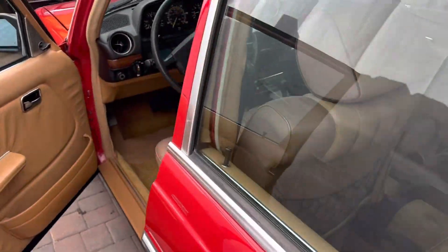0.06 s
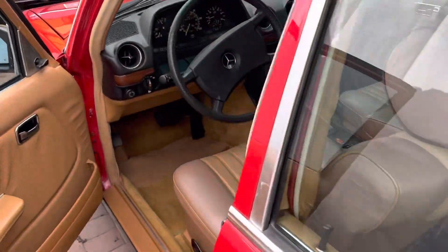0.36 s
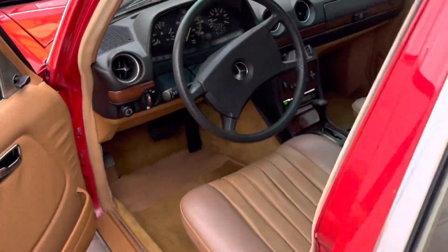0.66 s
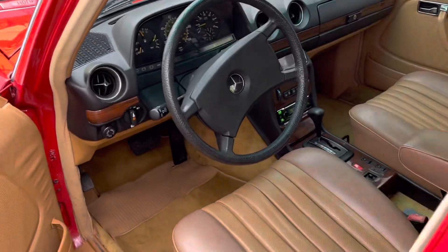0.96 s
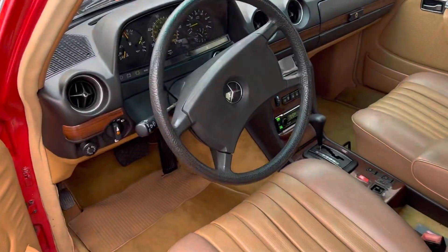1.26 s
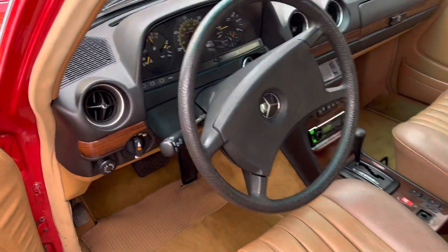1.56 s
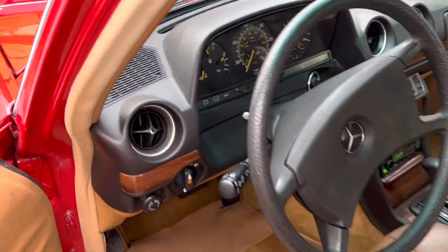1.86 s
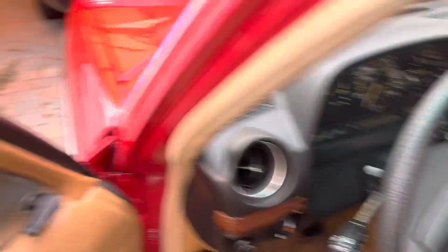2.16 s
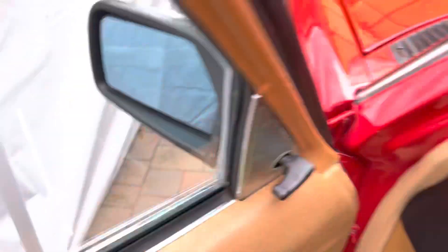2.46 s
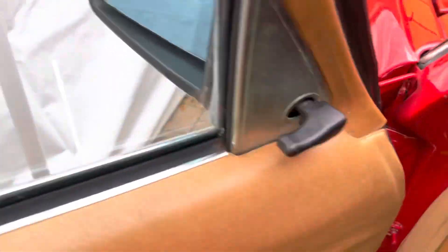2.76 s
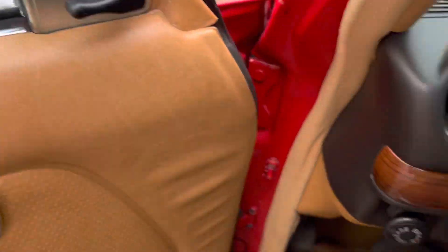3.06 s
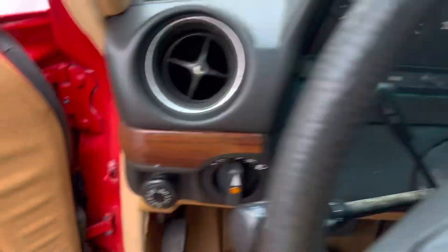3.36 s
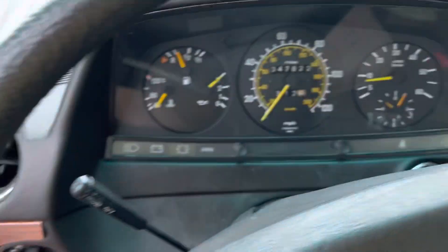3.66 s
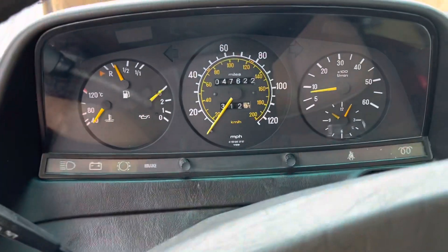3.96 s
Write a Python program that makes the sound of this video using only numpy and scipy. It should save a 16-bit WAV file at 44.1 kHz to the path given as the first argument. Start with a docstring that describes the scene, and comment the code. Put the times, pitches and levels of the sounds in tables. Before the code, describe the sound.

An old car engine idles with a low pulsing hum and a rasping, squeaky belt.

```python
"""At the open driver's door of an old four-cylinder car, the engine idling.
The firings make a low hum and a pulsing clatter; the drive belt rasps and hisses once per lap,
swinging between two pitches. Near the end the microphone moves into the cabin past a dashboard vent:
air buffets it briefly, the treble falls away and a faint hollow ring appears."""
import sys
import numpy as np
from scipy import signal
from scipy.fft import rfft, irfft
from scipy.io import wavfile
from scipy.ndimage import uniform_filter1d, minimum_filter1d

SR = 44100
rng = np.random.default_rng(int(sys.argv[2]) if len(sys.argv) > 2 else 0)


def file_out(sig):
    """Save sig as 16-bit WAV at sys.argv[1]."""
    # one column per channel
    cols = np.atleast_2d(sig).T
    # limit, then scale
    lim = np.clip(cols, -1, 1)
    pcm = np.round(lim * 32767).astype(np.int16)
    wavfile.write(sys.argv[1], SR, pcm)


N = 176400
TIME = np.arange(N) / SR
SIDES = np.array([[1], [-1]])   # left, right

FIRING_HZ, BELT_LAP_HZ, WHINE_HZ = 28.25, 5.65, 1824
WAVER_DB, WAVER_HZ = .7, 7.5   # unsteadiness of the engine's tones


# Hum partials: multiple of the firing rate, relative level/dB
HUM_ORDERS = [(1, -21), (3, 1), (4, -1), (5, -7.5), (6, -19.5), (7, -20.5), (8, -18), (9, -22), (10, -13.5),
              (12, -21.5), (14, -17), (17, -13)]
# Hum fader: t/s, level/dB
HUM_LEVEL = [(0, -35.5), (.2, -31.5), (1.0, -31), (2.2, -28.5), (3.05, -29.5), (3.3, -29), (3.76, -26.5),
             (3.82, -42), (4, -37)]
# Cabin boom fader: t/s, level/dB
BOOM_LEVEL = [(0, -27), (.1, -49), (.35, -28), (.6, -27), (.85, -36), (1.25, -29), (1.6, -32), (1.97, -24),
              (2.28, -41), (2.5, -24), (2.8, -24), (3.15, -39), (3.3, -18), (3.72, -22.5), (3.84, -47),
              (4, -43)]
def hum(firings, beat_hz=2.45, pulley_db=-4):
    """Harmonics of the firing rate; the second booms in the cabin, the fourth beats with a pulley."""
    orders = sum(waver(db) * harmonic(firings, round(multiple)) for multiple, db in HUM_ORDERS)
    pulley = from_db(pulley_db) * harmonic(firings + beat_hz * (TIME - 2.02) / 4, 4)
    boom = from_db(in_time(BOOM_LEVEL)) * harmonic(firings, 2)
    return from_db(in_time(HUM_LEVEL)) * (orders + pulley) + boom


def harmonic(firings, multiple, smear_turns=.24, side_db=-20.5):
    """One engine harmonic, drifting between the ears; higher ones lag, which spreads each pulse."""
    angle = 2 * np.pi * (multiple * firings - smear_turns * multiple ** 2)
    side = SIDES * from_db(side_db) * drift(WAVER_HZ) * np.cos(angle)
    return np.sqrt(2) * np.sin(angle) + side


# Clatter EQ: f/Hz, relative level/dB
CLATTER_EQ = [(540, -6.5), (720, 2.5), (900, 2.5), (1050, 0.5), (1400, 4.5), (2200, -11.5), (3000, -11.5),
              (5000, -21)]
# Clatter fader: t/s, level/dB
CLATTER_LEVEL = [(0, -28.5), (.35, -31.5), (.7, -31.5), (1.5, -32.5), (2.2, -33), (3.2, -32), (3.5, -37),
                 (4, -37.5)]
def clatter(firings, pulse_db=1):
    """Mechanical noise that swells with every firing."""
    gain = from_db(in_time(CLATTER_LEVEL) + pulse_db * swing(firings))
    return gain * banded_noise(CLATTER_EQ, bands=12)


# Rumble EQ: f/Hz, relative level/dB
RUMBLE_EQ = [(36, -22), (60, -4), (100, -4.5), (155, 2.5), (200, -9), (250, -4), (310, -4), (390, -4),
             (490, -8.5), (560, -7.5)]
# Rumble fader: t/s, level/dB
RUMBLE_LEVEL = [(0, -29.5), (.7, -30.5), (1.5, -28.5), (2.2, -29), (3.1, -26.5), (3.6, -32.5), (4, -29)]
def rumble(firings, pulse_db=1.35):
    """Low shaking of engine and body, throbbing with the firings."""
    gain = from_db(in_time(RUMBLE_LEVEL) + pulse_db * swing(firings))
    return gain * banded_noise(RUMBLE_EQ, bands=14)


# Resonances the belt rubs: f/Hz, width/Hz, level/dB, crest of the swing/laps, swing/dB
RASP_MODES = [(1647, 140, -36.5, 0.11, -2), (1811, 93, -37.5, 0, 6.5), (1916, 54, -37.5, 0.73, 0),
              (2063, 140, -38, 0.056, 3), (2283, 180, -44, 0.49, 1)]
# Rasp fader: t/s, relative level/dB
RASP_LEVEL = [(0, -3), (.04, 3), (.33, 3.5), (.85, 1), (.93, -6), (1.0, 1.5), (1.55, -1.5), (1.95, -1.5),
              (2.55, -2), (3.27, -1), (3.48, -7.5), (4, -4.5)]
def belt_rasp(firings, laps, pulse_db=1.2, grain_db=1.1):
    """On each lap the belt rasps high, then chirps lower; each firing tugs at it."""
    rasp = belt_whine(laps)
    for hz, width_hz, db, crest, swing_db in RASP_MODES:
        rasp += resonance(hz, width_hz) * from_db(db + swing_db * swing(laps - crest))
    tug = from_db(pulse_db * swing(firings) + grain_db * drift(25))
    return tug * (rasp * from_db(in_time(RASP_LEVEL)) + belt_chirps(laps))


def belt_whine(laps, swing_hz=100.7, db=-35.5):
    """A narrow, rough tone that glides up and down once per lap."""
    tone = signal.hilbert(resonance(WHINE_HZ, width_hz=90))
    return from_db(db) * np.real(tone * frequency_shift(swing_hz * swing(laps)))


# Squeaks, low on each lap and now and then high in between: t/s, level/dB, f/Hz
BELT_CHIRPS = [(.054, -25, 1747), (.233, -30, 1674), (.3, -25, 1900), (.422, -25, 1660), (.609, -36, 1660),
               (.795, -28, 1657), (.968, -31, 1697), (1.125, -26, 1663), (1.313, -24.5, 1686),
               (1.485, -24, 1650), (1.565, -24, 1820), (1.645, -26.5, 1645), (1.73, -27, 1858),
               (1.829, -26.5, 1665), (2.027, -32.5, 1690), (2.11, -32.5, 1902), (2.192, -28.5, 1655),
               (2.364, -32.5, 1623), (2.46, -25.5, 1838), (2.545, -25.5, 1673), (2.715, -30, 1665),
               (2.901, -26, 1673), (3.0, -31.5, 1818), (3.072, -29, 1692), (3.252, -27, 1660),
               (3.421, -34.5, 1660)]
def belt_chirps(laps, half_s=.029, boost_db=1, depth_hz=24.94):
    """Short rough squeaks, each on its own pitch and bent by the lap of the belt."""
    squeak = signal.hilbert(resonance(WHINE_HZ, width_hz=47))
    bend_hz = depth_hz * swing(laps)
    bursts = 0
    for s, db, hz in BELT_CHIRPS:
        shift_hz = hz - WHINE_HZ + bend_hz - np.interp(s, TIME, bend_hz)
        bursts += from_db(db + boost_db) * bell(s, half_s) * frequency_shift(shift_hz)
    return np.real(squeak * bursts)


# Scrape cues: t/s, level/dB, half length/s
CATCH_CUES = [(.098, -28, .005), (.14, -27, .009), (0.203, -27, .007), (0.245, -33, 0.0078),
              (.285, -25, 0.002), (.31, -21, 0.0022), (0.322, -22.5, .0035), (0.39, -33, 0.0034),
              (0.492, -27.5, 0.011), (.597, -31, .005), (0.635, -32, 0.0061), (0.667, -39, .007),
              (0.809, -30, 0.0044), (0.853, -38, 0.0073), (1.389, -29, 0.01), (2.096, -30.5, 0.0081),
              (2.278, -40, .008), (2.45, -36, .009), (3.16, -32, .012), (3.705, -36.5, 0.018)]
# Scrape EQ: f/Hz, relative level/dB
CATCH_EQ = [(1000, -27), (1500, -12), (1900, 4.5), (2350, 1), (2650, -10.5), (4200, -19.5), (9000, -31),
            (15000, -41)]
def belt_catches():
    """Brief broad scrapes where the belt catches on a pulley."""
    return coloured_noise(CATCH_EQ) * sum(from_db(db) * bell(s, half_s) for s, db, half_s in CATCH_CUES)


# Draught fader: t/s, level/dB
DRAUGHT_LEVEL = [(3.1, -60), (3.15, -31), (3.24, -17.5), (3.28, -16.5), (3.42, -18.5), (3.5, -22.5),
                 (3.62, -28.5), (3.77, -25), (3.82, -25.5), (4, -56)]
# Draught EQ: f/Hz, relative level/dB
DRAUGHT_EQ = [(36, -10), (55, 3), (80, 6.5), (130, -1), (220, 0), (330, -6), (500, -17), (800, -18),
              (1500, -46)]
# Thumps of air: t/s, level before overload/dB, half length/s, centre f/Hz
AIR_BUFFETS = [(3.162, -20.5, 0.013, 229), (3.202, -23, 0.013, 126), (3.272, -10, .008, 79.5),
               (3.275, -8, 0.006, 188), (3.317, -3.5, 0.0026, 308), (3.33, -7.5, 0.0045, 320),
               (3.325, -6, .012, 75), (3.348, -19.5, 0.0093, 263), (3.37, -14, 0.004, 171),
               (3.399, -10, 0.0056, 113), (3.401, -17.5, 0.0066, 417), (3.434, -8.5, 0.0047, 116),
               (3.426, -18.5, 0.007, 302), (3.487, -12.5, 0.0087, 103), (3.572, -18, 0.011, 95),
               (3.636, -20, 0.0083, 89), (3.779, -18, 0.0056, 83)]
def vent_air(spread=1.45, ceiling=2.8, top_hz=810):
    """Air from the vent flutters on the microphone; a few hard buffets softly overload it."""
    draught = evened(banded_noise(DRAUGHT_EQ, bands=10, flicker_db=0), samples=1500)
    air = from_db(in_time(DRAUGHT_LEVEL)) * draught
    for s, db, half_s, hz in AIR_BUFFETS:
        edges = hz / spread, hz * spread
        noise = band(rng.standard_normal((2, N)), *edges)
        eddy = stereo(band(noise, *edges), likeness=.97, balance_db=0)
        air += evened(eddy, samples=400) * from_db(db) * bell(s, half_s)
    overloaded = ceiling * np.tanh(air / ceiling)
    return signal.sosfilt(signal.butter(4, top_hz, fs=SR, output="sos"), overloaded)


# Accessory tones: f/Hz, level/dB
ACCESSORY_TONES = [(234, -39), (252, -44.5), (289, -54.5), (415, -56), (481, -41)]
# Accessory fader: t/s, relative level/dB
ACCESSORY_LEVEL = [(0, -5), (1.0, -3.5), (2.1, 1.5), (2.5, 5.5), (2.9, 3.5), (3.2, -6.5), (3.6, -10),
                   (4, 2)]
def accessories(waver_rad=.8):
    """Wavering tones of the belt-driven accessories."""
    tones = sum(waver(db) * np.sin(2 * np.pi * hz * TIME + waver_rad * drift(2.8))
                for hz, db in ACCESSORY_TONES)
    return np.sqrt(2) * tones * from_db(in_time(ACCESSORY_LEVEL))


# Hiss EQ: f/Hz, relative level/dB
HISS_EQ = [(800, 5), (1250, 10), (2300, 7.5), (2850, 2.5), (3080, 1.5), (3400, -4), (3850, -1), (4250, 2.2),
           (4600, -4), (5500, -1.5), (6250, 1), (7300, -4), (7800, 0), (8800, -2.5), (10200, -30),
           (11500, -3), (13000, -9.5), (15500, -11.5)]
# Hiss fader: t/s, level/dB
HISS_LEVEL = [(0, -34), (.3, -35), (.8, -36), (1.4, -37.5), (1.9, -38.5), (2.7, -38), (3.05, -40),
              (3.19, -39), (3.38, -44), (3.7, -43), (4, -45)]
def hiss(firings, laps, lap_db=1.05, pulse_db=.6, flicker_db=.35):
    """Bright, slightly uneven hiss of belt and fan that swells once per lap."""
    level_db = in_time(HISS_LEVEL) + lap_db * swing(laps) + pulse_db * swing(firings)
    return coloured_noise(HISS_EQ) * from_db(level_db + flicker_db * drift(9.8))


def cabin_ring(hz=725, db=-39.5, door_frame_s=3.6, fade_s=.055):
    """The cabin's faint hollow tone fades in as the microphone passes the door frame."""
    inside = (1 + np.tanh((TIME - door_frame_s) / fade_s)) / 2
    return from_db(db) * resonance(hz, width_hz=48) * inside


# Stereo width: f/Hz, left-right likeness (-1 opposed, 1 mono)
STEREO_LIKENESS = [(60, .93), (130, .88), (290, .75), (500, .3), (700, .1), (900, .25), (1400, 0),
                   (2300, .5), (4000, .27), (6300, .15), (7300, .6), (8800, -.05), (9300, -.94),
                   (10800, -.97), (11100, .1), (12400, .93), (15000, .9)]
# Pan: f/Hz, left minus right level/dB
STEREO_BALANCE = [(60, 2), (300, -0.5), (700, 0.1), (2000, 1), (3200, 3.5), (5000, 4.5), (6600, 4.5),
                  (7300, 4), (9000, -2.5)]
def spaced_microphones(pair, hz):
    """The two microphones agree or oppose by frequency."""
    return stereo(pair, at_hz(STEREO_LIKENESS, hz), at_hz(STEREO_BALANCE, hz))


def stereo(pair, likeness, balance_db):
    """Two unrelated noises become left and right with a given likeness."""
    mid = np.sqrt(1 + likeness) * pair[0]
    side = np.sqrt(1 - likeness) * pair[1] * SIDES
    return (mid + side) * from_db(SIDES * balance_db / 2)


def banded_noise(eq, bands, flicker_db=2.12):
    """Unit-power noise in narrow bands, each with its own level, flicker and stereo width."""
    edges = np.geomspace(eq[0][0], eq[-1][0], bands + 1)
    white = rng.standard_normal((2, 2, N))
    noise = 0
    for k, (low, high) in enumerate(zip(edges, edges[1:])):
        hz = np.sqrt(low * high)
        gain = from_db(at_hz(eq, hz) + flicker_db * drift(22.5))
        noise += gain * spaced_microphones(band(white[k % 2], low, high), hz)
    return rms_one(noise)


def coloured_noise(eq):
    """Smooth stereo noise of unit power, rolled off below the first EQ point."""
    hz = np.maximum(np.fft.rfftfreq(N, 1 / SR), 1)
    gain = from_db(at_hz(eq, hz)) / np.sqrt(1 + (eq[0][0] / hz) ** 4)
    white = rfft(rng.standard_normal((2, N)))
    return rms_one(irfft(gain * spaced_microphones(white, hz), N))


def resonance(hz, width_hz):
    """A narrow resonance kept ringing by noise, at an even level."""
    r = np.exp(-np.pi * width_hz * np.sqrt(2) / SR)
    b, a = [1 - r, 0, r - 1], [1, -2 * r * np.cos(2 * np.pi * hz / SR), r * r]
    rung = signal.lfilter(b, a, signal.lfilter(b, a, rng.standard_normal((2, N))))
    return evened(stereo(rung, likeness=.061, balance_db=1.6), samples=2000)


def drift(rate_hz, step=40):
    """Slow random wander with spread 1."""
    r = np.exp(-2 * np.pi * rate_hz * step / SR)
    slow = signal.lfilter([1], [1, -2 * r, r * r], rng.standard_normal(N // step + 2002))[2000:]
    return np.interp(np.arange(N) / step, np.arange(len(slow)), rms_one(slow))


def waver(db):
    """A gain that wanders slightly around a level."""
    return from_db(db + WAVER_DB * drift(WAVER_HZ))


def swing(turns):
    """One rise and fall per turn, highest on the whole turn."""
    return np.cos(2 * np.pi * turns)


def bell(s, half_s):
    """A smooth rise and fall around one moment."""
    return np.exp(-.5 * np.minimum(((TIME - s) / half_s) ** 2, 100))


def frequency_shift(hz):
    """A phasor that slides an analytic signal by a curve in Hz."""
    return np.exp(2j * np.pi * np.cumsum(hz) / SR)


def band(x, low_hz, high_hz):
    """Gentle band-pass."""
    return signal.sosfilt(signal.butter(2, [low_hz, high_hz], "band", fs=SR, output="sos"), x)


def evened(x, samples):
    """Take the slow chance swings out of a noise."""
    return x / np.sqrt(uniform_filter1d(np.mean(x ** 2, axis=0), samples) + 1e-12)


def in_time(rows):
    """A fader's level at every sample."""
    return np.interp(TIME, *np.transpose(rows))


def at_hz(points, hz):
    """Read a curve on a log-frequency axis."""
    f, value = np.transpose(points)
    return np.interp(np.log(hz), np.log(f), value)


def from_db(db):
    """Decibels to gain."""
    return 10 ** (np.asarray(db) / 20)


def rms_one(x):
    """Scale to unit power."""
    return x / np.sqrt(np.mean(x ** 2) + 1e-20)


def scene(wander_s=.0004, right_lag_s=.00002):
    """The slightly unsteady crankshaft times firings and belt; the engine sits a little to the left."""
    crank_s = TIME + wander_s * drift(2.02)
    firings = FIRING_HZ * (crank_s - .001)
    laps = BELT_LAP_HZ * (crank_s - .14)
    left, right = (hum(firings) + accessories() + rumble(firings) + clatter(firings)
                   + belt_rasp(firings, laps))
    engine = np.array([left, np.interp(TIME - right_lag_s, TIME, right)])
    return engine + belt_catches() + hiss(firings, laps) + cabin_ring() + vent_air()


def record(dry, cutoff_hz=15700):
    """A fast limiter holds the peaks under full scale, and the top is cut."""
    headroom = np.minimum(1, .95 / (np.abs(dry).max(axis=0) + 1e-9))
    limited = dry * uniform_filter1d(minimum_filter1d(headroom, size=200), size=200)
    return signal.sosfilt(signal.cheby2(14, 60, cutoff_hz, fs=SR, output="sos"), limited)


dry = scene()
out = record(dry)
file_out(out)
```